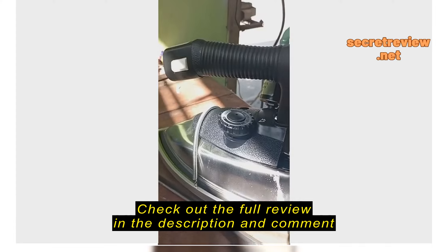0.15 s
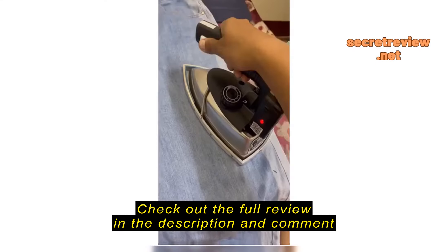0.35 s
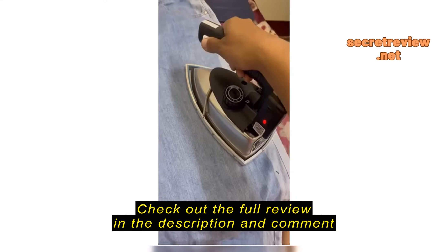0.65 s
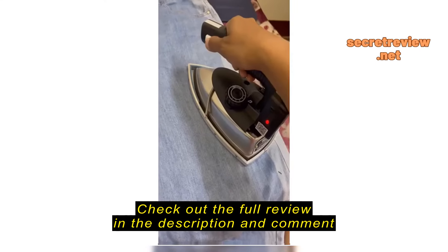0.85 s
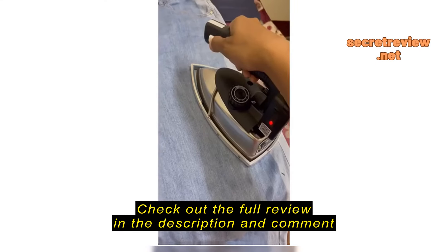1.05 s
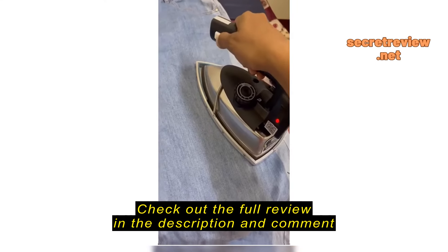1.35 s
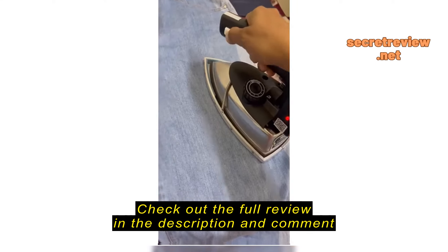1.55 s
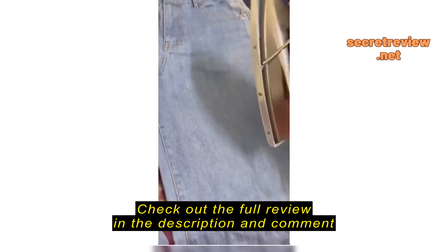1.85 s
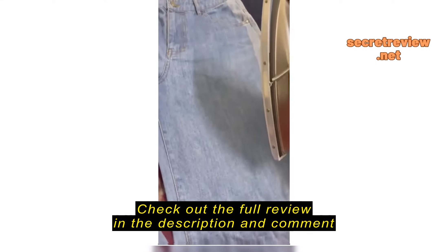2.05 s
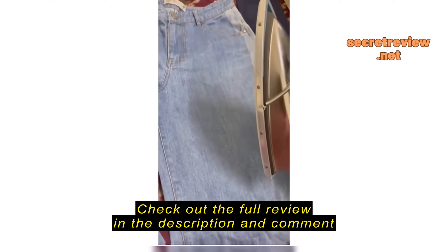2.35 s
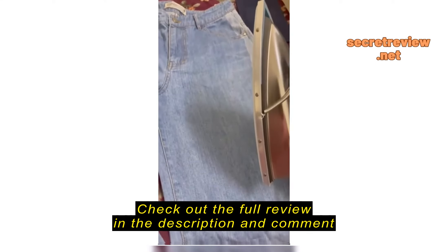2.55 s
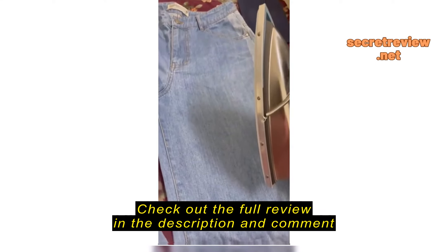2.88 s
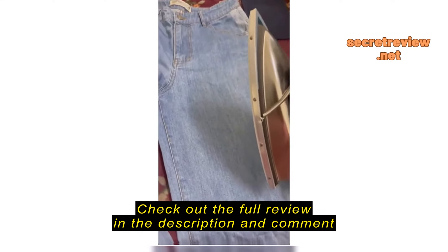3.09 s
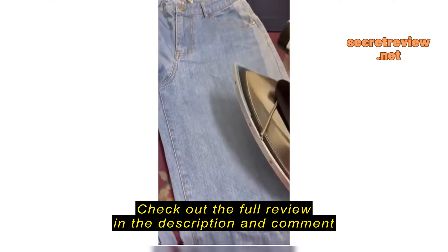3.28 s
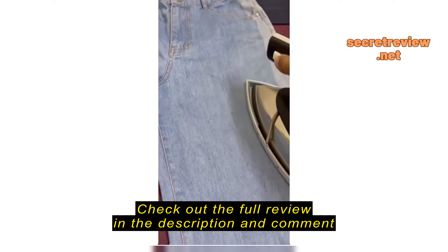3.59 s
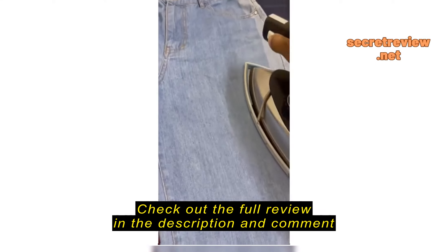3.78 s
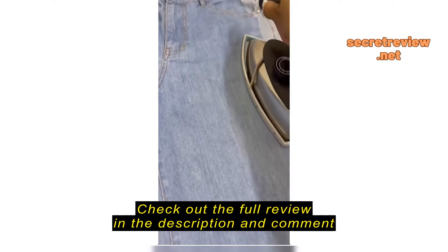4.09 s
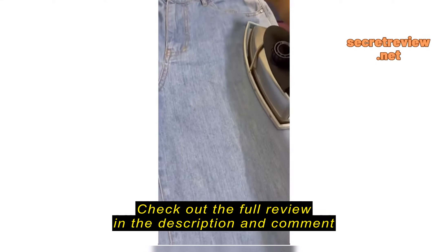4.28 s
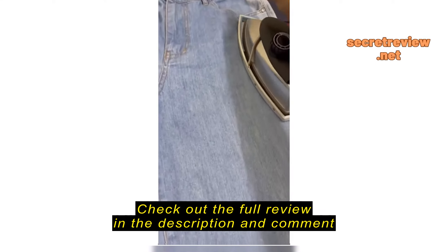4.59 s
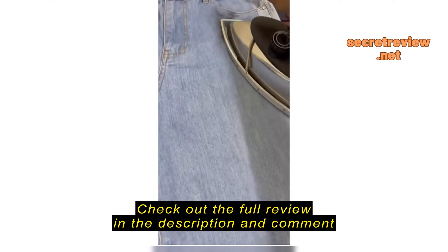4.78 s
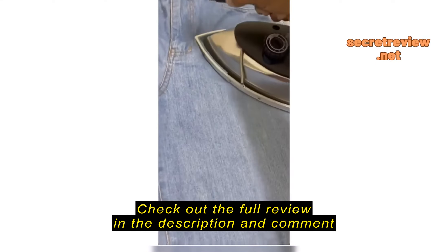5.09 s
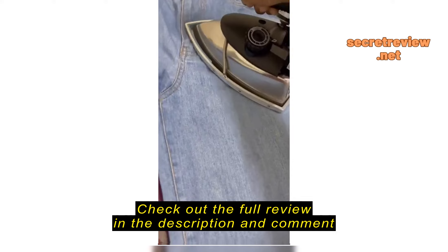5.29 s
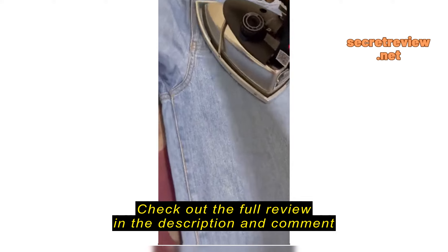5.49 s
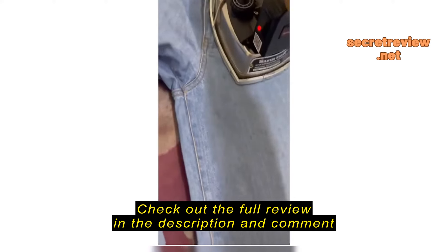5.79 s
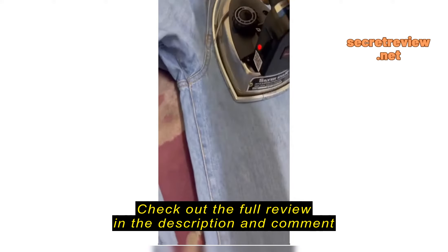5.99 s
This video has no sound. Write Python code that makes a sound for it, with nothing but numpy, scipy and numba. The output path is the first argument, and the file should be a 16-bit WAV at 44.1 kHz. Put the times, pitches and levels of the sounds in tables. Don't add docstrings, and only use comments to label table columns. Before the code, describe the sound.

After a near-silent second, an iron's switch clicks loudly; airy steam jets swell and sputter over softly rustling jeans, with dull grip bumps.

```python
import sys
import numpy as np
from scipy import signal
from scipy.fft import rfft, irfft
from scipy.io import wavfile
from scipy.ndimage import uniform_filter1d
from numba import njit

SR = 44100
rng = np.random.default_rng(int(sys.argv[2]) if len(sys.argv) > 2 else 0)


def convert_level_to_amplitude(level_db):
    exponent = np.asarray(level_db, float) / 20
    return 10 ** exponent


def to_wav(s):
    ch = np.atleast_2d(s).T
    pcm = np.round(np.clip(ch, -1, 1) * 32767)
    wavfile.write(sys.argv[1], SR, pcm.astype(np.int16))


N = 270896


def unit(x):
    return x / np.sqrt(np.mean(x ** 2))


def on_log(table, hz):
    f, v = np.transpose(table)
    return np.interp(np.log(np.maximum(hz, 1)), np.log(f), v)


def curves(table):
    s, *columns = np.transpose(table)
    return [np.interp(np.arange(N) / SR, s, c) for c in columns]


def swells(rows):
    t = np.arange(N) / SR
    return sum(size * np.exp(-((t - s) / half) ** 2) for s, size, half in rows)


def walk(rate):
    k = int(SR / rate)
    held = np.repeat(rng.standard_normal(N // k + 1), k)
    w = uniform_filter1d(uniform_filter1d(held, k), k)[:N]
    return w / w.std()


# f/Hz, phase [rad]
PORT_PHASE = [(0, 0), (2500, .1), (3300, 1.4), (4000, .3), (4850, 3.1), (5500, 6.1), (6500, 6.3),
              (8300, 9.3)]
# f/Hz, shared share [0..1]
COHERENCE = [(60, .85), (250, .4), (600, .75), (1100, .65), (1500, .99), (2400, .97), (3100, .5),
             (4000, .95), (4450, .6), (4850, .99), (5700, .97), (6600, .98), (7300, .7), (8500, .98)]


def ports(near, far, alike=0.96, lead=1):
    hz = np.fft.rfftfreq(N, 1 / SR)
    share = np.clip(alike * on_log(COHERENCE, hz), 0, 1)
    turn = np.exp(1j * lead * np.interp(hz, *np.transpose(PORT_PHASE)) / 2)
    a, b = rfft(near), rfft(far)
    left = turn * a
    right = (share * a + np.sqrt(1 - share ** 2) * b) / turn
    return np.array([irfft(left, N), irfft(right, N)])


TOP_HZ = 9760


def coloured(x, table):
    hz = np.fft.rfftfreq(N, 1 / SR)
    inside = (hz > table[0][0] * .8) & (hz < min(table[-1][0] * 1.03, TOP_HZ))
    return unit(irfft(rfft(x) * convert_level_to_amplitude(on_log(table, hz)) * inside, N))


def turbulence(table, flicker_db, rate, spit_db):
    spit = convert_level_to_amplitude(spit_db * np.minimum(rng.exponential(size=N // 40 + 1), 4)).repeat(40)[:N]
    noise = rng.standard_normal((2, N)) * spit
    return coloured(noise, table) * convert_level_to_amplitude(flicker_db * walk(rate))


@njit
def band(x, hz, width):
    y, b, l = np.empty(len(x)), 0., 0.
    for i in range(len(x)):
        g, k = np.tan(np.pi * hz[i] / SR), width / hz[i]
        v = (b + g * (x[i] - l)) / (1 + g * (g + k))
        b, l, y[i] = 2 * v - b, l + 2 * g * v, k * v
    return y


# f/Hz, level/dB [per Hz]
ROOM_AIR = [(130, -26), (160, -20), (220, -18), (282, -3), (414, -15), (700, -9.5), (1310, -12),
            (1900, -18.5), (3300, -27), (4800, -33), (5500, -27), (6300, -32), (7000, -25.5), (7600, -39.5),
            (9700, -43)]
ROOM_DB = -59.5


def room():
    return convert_level_to_amplitude(ROOM_DB + 1.5) * ports(*turbulence(ROOM_AIR, 0.71, 13, 0.4), alike=.45)


# f/Hz, level/dB [per Hz]
HAND_RUMBLE = [(18, -32), (30, -4), (47, 6), (65, 3), (230, -16), (300, -50.5), (510, -120)]
# t/s, peak level/dB, half length [s]
HAND_SHIFTS = [(0.151, -49.5, 0.053), (0.31, -59, .04), (0.455, -43.5, 0.042), (0.763, -51.5, 0.074),
               (0.906, -51, 0.025), (1.145, -46.5, .015), (1.238, -42.5, 0.049), (1.415, -54, 0.033),
               (1.75, -67, 0.32), (2.03, -47, 0.025), (2.155, -59, 0.023), (2.334, -53.5, 0.029),
               (2.453, -50, 0.032), (2.657, -55, 0.032), (2.776, -50, 0.066), (3.419, -42, 0.022),
               (3.51, -51.5, 0.023), (3.733, -57, 0.073), (3.909, -37.5, 0.058), (3.995, -50, .04),
               (4.115, -44, 0.071), (4.414, -58, 0.037), (5.017, -58, .02), (5.5, -60.5, 0.17),
               (5.635, -48, .02), (5.725, -52.5, 0.039), (5.945, -50, 0.22), (6.13, -51, 0.025)]
# t/s, peak level/dB, f/Hz, t60 [s], knock level/dB [re thump]
GRIP_THUMPS = [(0.15, -32.5, 68.4, 0.1, -31), (0.432, -30, 125, 0.096, -9.5), (0.453, -27.5, 80, 0.12, -10),
               (1.2, -40, 61.5, 0.13, -19), (1.233, -41, 86.1, 0.05, -3), (2.027, -32, 110, 0.059, -6),
               (2.799, -44, 78.4, 0.081, -9), (3.42, -29.5, 90.5, 0.079, -9.5),
               (3.887, -24.5, 72, 0.092, -20), (3.909, -29.5, 90, 0.099, 3),
               (3.961, -28.5, 110, 0.088, -14), (4.09, -41, 60, 0.08, -8), (4.419, -36.5, 56.5, 0.13, -21),
               (5.447, -52, 52, 0.12, -4), (5.618, -32.5, 114, 0.07, -10.5)]
HOLD_DB = -63


def grip():
    hand = convert_level_to_amplitude(HOLD_DB) + swells((s, convert_level_to_amplitude(db), half) for s, db, half in HAND_SHIFTS)
    mid, side = turbulence(HAND_RUMBLE, 1, 6.7, .3) * hand * convert_level_to_amplitude(-2.5)
    t = np.arange(int(SR * .25)) / SR
    for s, db, hz, t60, knock_db in GRIP_THUMPS:
        i = int(s * SR)
        ring = convert_level_to_amplitude(-60 * t / t60)
        thump = (1 - np.exp(-t / 0.008)) * ring * np.sin(2 * np.pi * hz * t)
        knock = (1 - np.exp(-t / 0.00094)) * convert_level_to_amplitude(-60 * t / 0.04) * np.sin(2 * np.pi * 230 * t)
        twist = (1 - np.exp(-t / .007)) * ring * np.cos(2 * np.pi * 150 * t)
        mid[i:i + len(t)] += convert_level_to_amplitude(db - 0.5) * thump + convert_level_to_amplitude(db + knock_db) * knock
        side[i:i + len(t)] += convert_level_to_amplitude(db - 3) * twist
    return np.array([mid + .33 * side, mid - .33 * side])


# t/s, flow level/dB, share pressed through cloth level/dB,
# aim of the vents at the phone level/dB
STEAM_FLOW = [(1.3, -69, 1, 6), (1.44, -66, 5.5, 2), (1.56, -47.5, -4.5, 2.5), (1.62, -52, 0.5, 3),
              (1.74, -44, 4, 3.5), (1.88, -34.5, -7, 6), (2.04, -46.5, -2.5, -4), (2.45, -41.5, -11, -10.5),
              (2.92, -30.5, -7.5, 5), (3.27, -49, -1.5, -5.5), (3.41, -37, -8.5, -1), (3.59, -58, 1, -8.5),
              (3.77, -42.5, 0.5, -0.5), (3.95, -36.5, -2.5, 2.5), (4.45, -52, -4, -4),
              (4.82, -60.5, -2.5, 3.5), (5.55, -42.5, -8.5, 2.5), (6.14, -51, -1.5, -2.5)]
# t/s, change of level/dB, half length [s]
FLOW_SPURTS = [(1.8, -1, 0.0079), (1.94, 1.5, 0.0091), (2.1, 3.5, .015), (2.14, -9.5, 0.023),
               (2.24, 4.5, 0.011), (2.295, -12, 0.015), (2.33, -0.5, .012), (2.41, 3.5, 0.014),
               (2.505, 5, 0.012), (2.565, 3.5, 0.019), (3.97, 2, 0.024), (4.1, -3.5, 0.11),
               (4.28, 3, 0.086), (4.68, 1.5, 0.11), (4.79, -3.5, 0.04), (5.0, -4, .03), (5.25, 1.5, 0.058),
               (5.85, 1.5, 0.15), (1.5, 4, 0.033), (6.07, -1.5, 0.055)]
AIM_PER_SPURT = 1


def flow():
    jet_db, cloth_db, aim_db = curves(STEAM_FLOW)
    spurt_db = swells(FLOW_SPURTS)
    return jet_db + spurt_db, cloth_db, aim_db + AIM_PER_SPURT * spurt_db


# t/s, peak level/dB, half length [s]
CREASE_SCUFFS = [
    (1.285, -48, 0.014),
    (1.86, -54.5, 0.043),
    (2.876, -68, 0.041),
    (3.918, -51, 0.021),
    (5.446, -47, .012),
    (4.15, -57.5, 0.33),
    (6.107, -55, 0.31),
]
DRAG_DB, DRAG_PER_FLOW = -58.5, 0.54


def cloth():
    jet_db, cloth_db, _ = flow()
    drag = convert_level_to_amplitude(DRAG_DB + DRAG_PER_FLOW * (jet_db + cloth_db + 52.5))
    drag = drag + swells((s, convert_level_to_amplitude(db), half) for s, db, half in CREASE_SCUFFS)
    fade = np.clip((np.arange(N) / SR - 1.2) / 0.13, 0, 1)
    denim = [(200, -9.0), (290, -1.0), (450, 1), (800, -6.5), (1100, -13.0)]  # f/Hz, level/dB
    return ports(*(fade * drag * convert_level_to_amplitude(-2.0) * turbulence(denim, 1.6, 14, 1.0)))


# t/s, peak level/dB, rise [s], t60 [s]
SNAPS = [
    (1.149, -34.5, 0.0011, 0.065),
    (1.273, -28, .001, 0.033),
    (1.276, -7.5, 0.0006, 0.015),
    (1.2844, -24.5, .0006, 0.025),
]
# f/Hz, width [Hz], level/dB
HOUSING_MODES = [(1910, 140, 9), (2250, 200, 5), (2800, 300, 3), (3880, 300, 0), (4500, 500, 7),
                 (5350, 600, -1), (7150, 500, 0), (7990, 400, 14), (9400, 700, -3)]


def switch():
    burst = np.zeros((2, N))
    t = np.arange(int(SR * .15)) / SR
    for s, db, rise, t60 in SNAPS:
        decay = convert_level_to_amplitude(-60 * t / t60) + convert_level_to_amplitude(-30.0 - 60 * t / 0.25)
        shape = (1 - np.exp(-t / rise)) ** 2 * decay
        i = int(s * SR)
        burst[:, i:i + len(t)] += convert_level_to_amplitude(db) * shape * rng.standard_normal((2, len(t)))
        burst[:, int((s + 1.5 * rise) * SR)] += convert_level_to_amplitude(db + 2.5)
    body = convert_level_to_amplitude(-11.5) * np.array([band(b, np.full(N, 650.), 500.) for b in burst])
    burst = signal.sosfilt(signal.butter(4, [1750, 9900], "band", fs=SR, output="sos"), burst)
    ringing = np.zeros((2, N))
    for hz, width, db in HOUSING_MODES:
        ringing += convert_level_to_amplitude(db) * np.array([band(b, np.full(N, 1. * hz), 1. * width) for b in burst])
    return ports(*(ringing * convert_level_to_amplitude(3.5) + body), alike=0.95, lead=0.99)


# f/Hz, level/dB [per Hz]
JET_CORE = [(3600, -19.5), (4600, -10), (5150, -3), (5800, 3), (6700, -1), (7400, -5), (8200, -25)]
JET_THROAT = [(700, -15), (1100, -4.5), (1500, -2), (2000, -1.5), (2500, -3.5), (3000, -7.5), (3500, -26.5)]
JET_MIDDLE = [(2400, -8), (3000, -2.5), (3700, -5.5), (4300, -8.5), (4800, 2), (5300, -10.5)]
JET_EDGE = [(6500, -9.5), (7400, -3), (8500, 0), (9300, 1), (9800, -2)]
# t/s, detour [cm]
ECHO_DETOUR = [
    (1.3, 5.4),
    (1.77, 5.4),
    (1.98, 18.6),
    (3.1, 19.6),
    (3.46, 18.5),
    (3.62, 11),
    (3.78, 5.2),
    (4.3, 5.55),
    (6.14, 5.45),
]
# t/s, rise of level/dB
TREBLE_GLINTS = [(1.31, 12), (1.36, 10), (1.41, 7), (1.5, 6), (1.57, 5), (1.77, 4), (1.88, 6), (2.0, 4),
                 (2.07, 5), (2.17, 10), (2.23, 9), (2.33, 11), (2.37, 10), (2.64, 10), (2.71, 10), (2.9, 10)]
MIDDLE_DB, MIDDLE_PER_CLOTH, MIDDLE_PER_AIM = -3.5, 0.14, 0.67
EDGE_DB, EDGE_PER_AIM = 1.5, 0.85
VALVE_S, VALVE_DB, VALVE_FALL_DB_S = 1.235, -37.5, 120
SOUND_CM_S = 34300
STRAY_DB, STRAY_FADE_S = (-11, -22), (1.8, 4.3)
GLINT_HALF_S = .025


def steam():
    t = np.arange(N) / SR
    jet_db, cloth_db, aim_db = flow()
    valve = convert_level_to_amplitude(VALVE_DB - VALVE_FALL_DB_S * np.maximum(t - VALVE_S, 0) - jet_db)
    middle_db = MIDDLE_DB + MIDDLE_PER_CLOTH * cloth_db + MIDDLE_PER_AIM * aim_db + 3.0
    edge_db = EDGE_DB + EDGE_PER_AIM * aim_db - 0.72
    hiss = convert_level_to_amplitude(1) * turbulence(JET_CORE, 0.55, 30, 1.0)
    hiss += convert_level_to_amplitude(cloth_db - 0.67) * turbulence(JET_THROAT, 1.8, 16, 0.63)
    hiss += convert_level_to_amplitude(middle_db) * turbulence(JET_MIDDLE, 2.38, 25, 0.68)
    hiss += (convert_level_to_amplitude(edge_db) + valve) * turbulence(JET_EDGE, 1.9, 25, 1.9)
    opening = np.clip((t - 1.28) / .03, 0, 1)
    hiss *= opening * convert_level_to_amplitude(jet_db + 1.1 * walk(40))

    hz = SOUND_CM_S / (2 * curves(ECHO_DETOUR)[0])
    third = np.clip((6000 - 3 * hz) / 1500, 0, 1)
    notched = []
    for h in hiss:
        first_notch = .85 * band(h, hz * convert_level_to_amplitude(.45 * walk(16)), 700.)
        third_notch = (.7 + .12 * walk(6)) * third * band(h, 3 * hz, 700.)
        notched.append(h - first_notch - third_notch)
    hiss = np.array(notched)

    scatter_db = np.interp(t, STRAY_FADE_S, STRAY_DB) + 1.5 * walk(20)
    scatter_db = scatter_db + swells((s, db, GLINT_HALF_S) for s, db in TREBLE_GLINTS)
    treble = signal.sosfilt(signal.butter(2, 3500, "high", fs=SR, output="sos"), hiss)
    signs = rng.choice([-1, 1], (2, N // 256 + 1)).repeat(256, axis=1)[:, :N]
    return ports(*hiss) + convert_level_to_amplitude(scatter_db) * treble * signs


def scene():
    return steam() + cloth() + switch() + grip() + room()


BAND_STARTS = [0, 48, 56, 64, 72, 80, 88, 96, 108, 120, 132, 144, 160, 176, 196, 216, 240, 264, 292, 320,
               352, 384, 416, 480]


def thrift(x, weaker_db, hollow_db, weak_db):
    pair = np.pad([x[0] + x[1], x[0] - x[1]], ((0, 0), (502, 0))) / 2
    frames = dict(fs=SR, window="cosine", nperseg=2048, noverlap=1024)
    z = signal.stft(pair, **frames)[2]
    power = abs(z) ** 2 + 1e-18
    lines = np.arange(z.shape[1])
    band_of = np.searchsorted(BAND_STARTS, lines, "right") - 1
    wide = np.add.reduceat(power, BAND_STARTS, axis=1)
    rival = wide[::-1] * convert_level_to_amplitude(2 * weaker_db + 3 * rng.standard_normal(wide.shape))
    keep = (wide > rival)[:, band_of]
    fine = uniform_filter1d(power, size=6, axis=1)[:, lines // 6 * 6 + 1]
    keep &= fine > uniform_filter1d(power.sum(axis=0), size=70, axis=0) * convert_level_to_amplitude(2 * hollow_db)
    run = uniform_filter1d(fine, size=2, axis=2)
    thin_db = weak_db + 1.6 * uniform_filter1d(rng.standard_normal(wide.shape[1:]), size=3, axis=1)
    strong = run > uniform_filter1d(power, size=40, axis=1) * convert_level_to_amplitude(2 * thin_db)[band_of]
    keep &= strong | (lines < BAND_STARTS[9])[:, None]
    keep[:, :BAND_STARTS[1]] = True
    total = wide[:, 1:].sum(axis=(0, 1))
    keep |= total > 12 * np.roll(total, 2)
    mid, side = signal.istft(z * keep, **frames)[1][:, 502:502 + N]
    return np.array([mid + side, mid - side])


def top_cut(x):
    return signal.sosfilt(signal.butter(12, 10370, fs=SR, output="sos"), x)


def record(dry):
    start_s = .1475
    live = dry * (np.arange(N) >= start_s * SR)
    live = signal.sosfilt(signal.ellip(6, .2, 50, 10300, fs=SR, output="sos"), live)
    live = signal.sosfilt(signal.butter(3, 40, "high", fs=SR, output="sos"), live)
    live = thrift(live, weaker_db=-7.5, hollow_db=-10, weak_db=-2.5)
    return top_cut(live)


dry = scene()
out = record(dry)
to_wav(out)
```